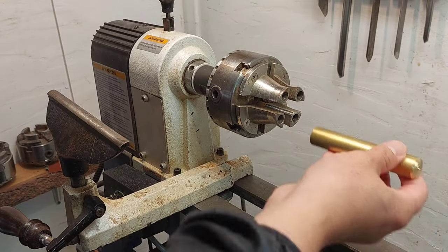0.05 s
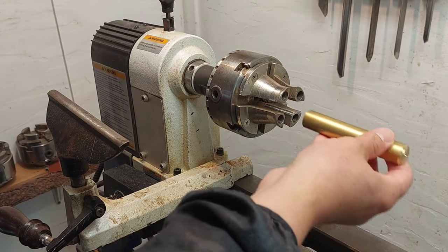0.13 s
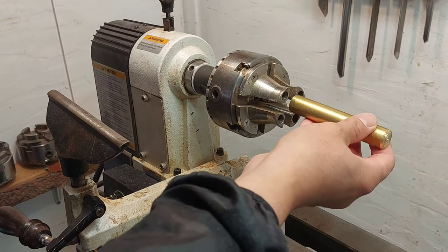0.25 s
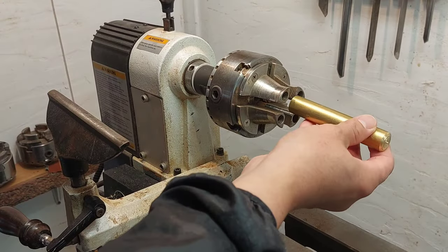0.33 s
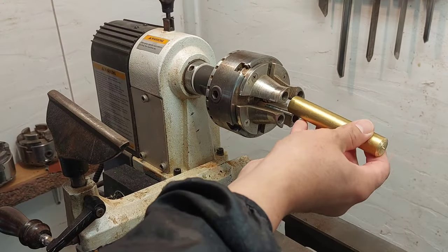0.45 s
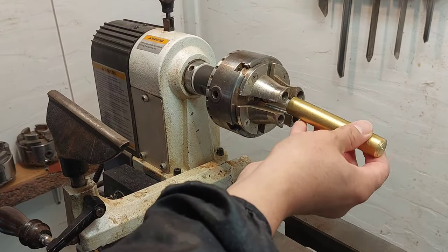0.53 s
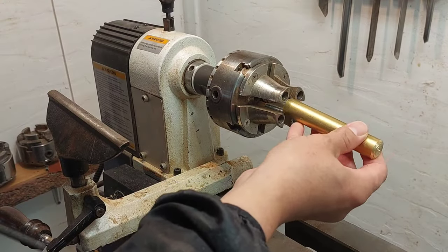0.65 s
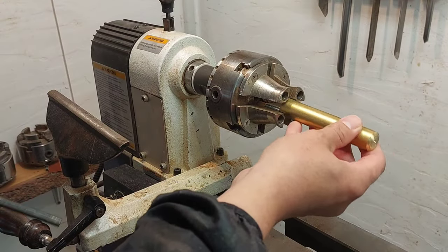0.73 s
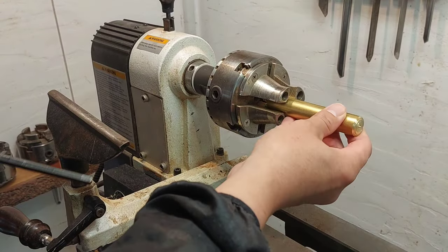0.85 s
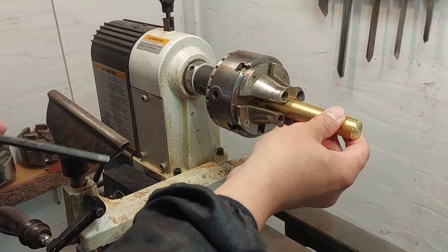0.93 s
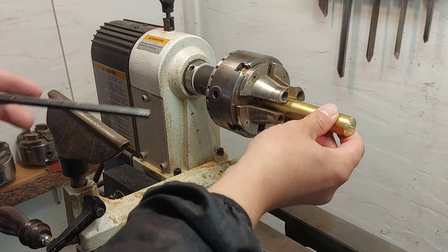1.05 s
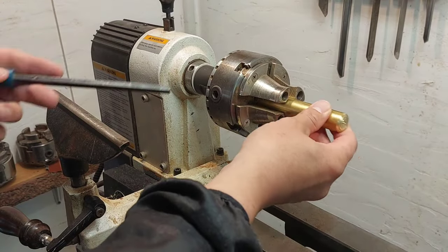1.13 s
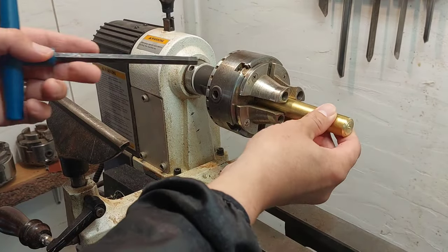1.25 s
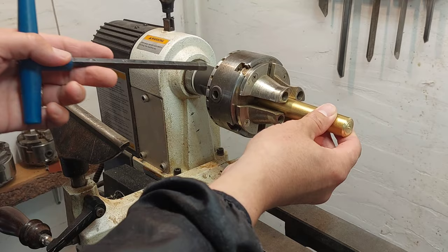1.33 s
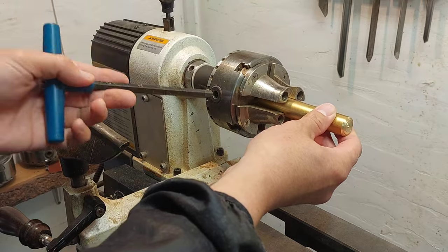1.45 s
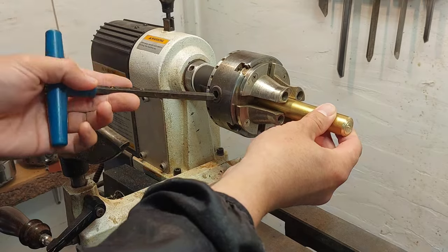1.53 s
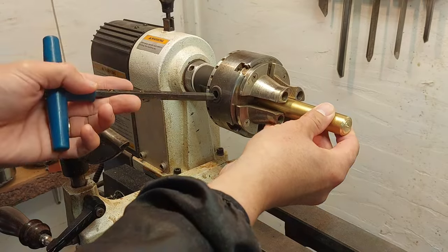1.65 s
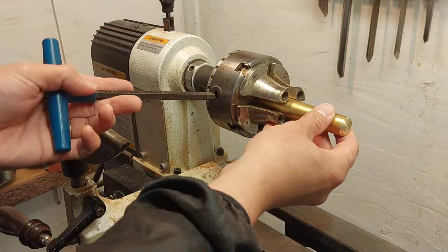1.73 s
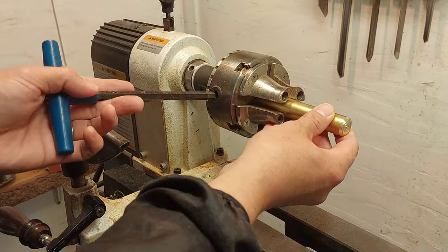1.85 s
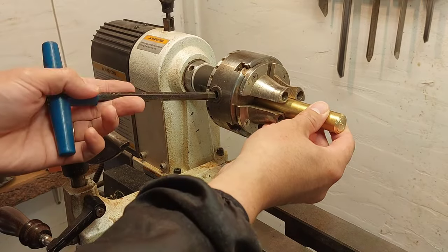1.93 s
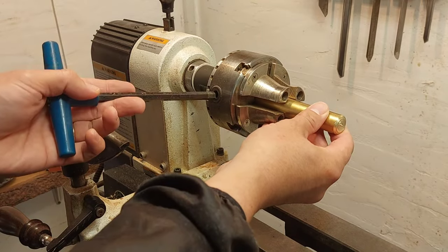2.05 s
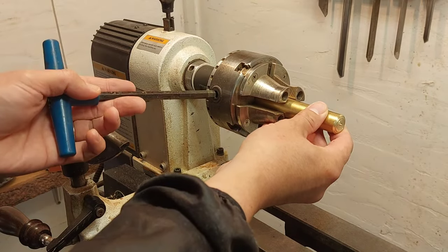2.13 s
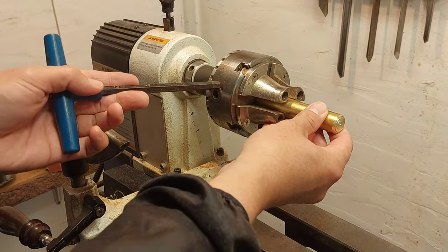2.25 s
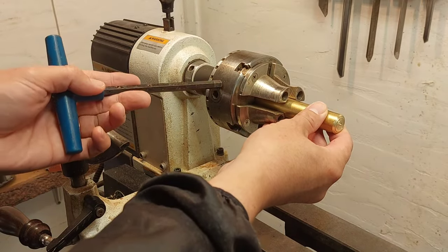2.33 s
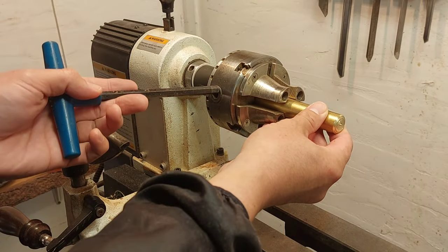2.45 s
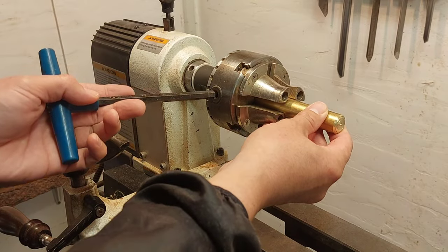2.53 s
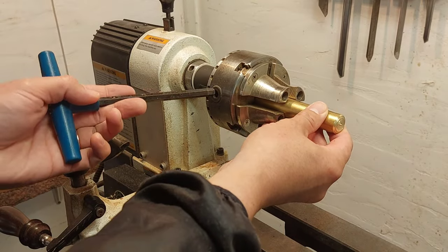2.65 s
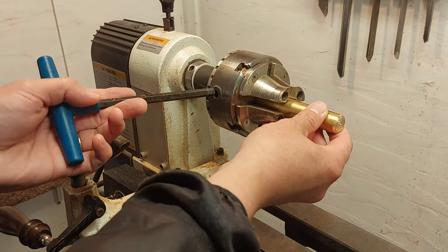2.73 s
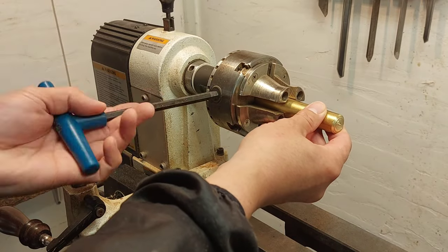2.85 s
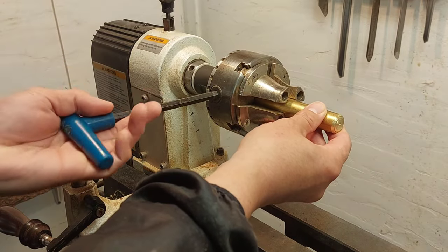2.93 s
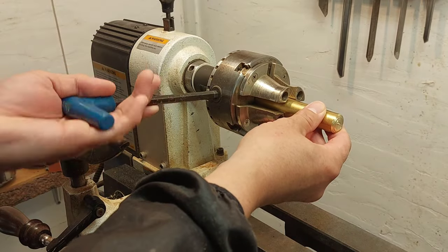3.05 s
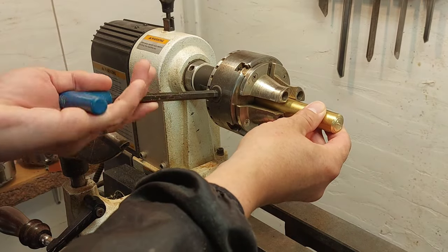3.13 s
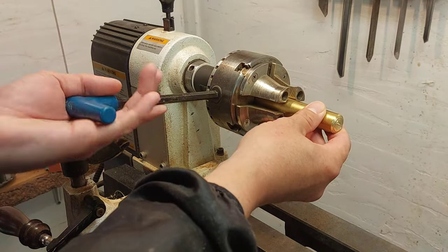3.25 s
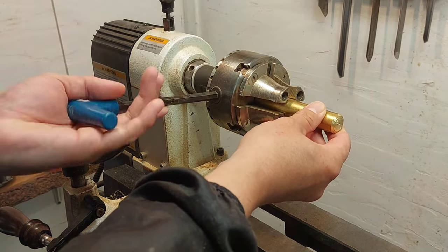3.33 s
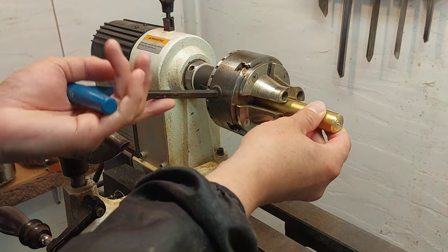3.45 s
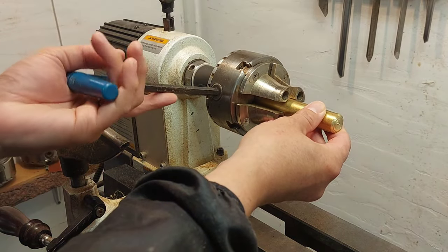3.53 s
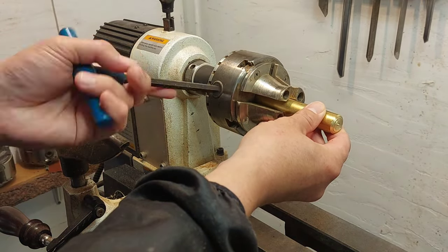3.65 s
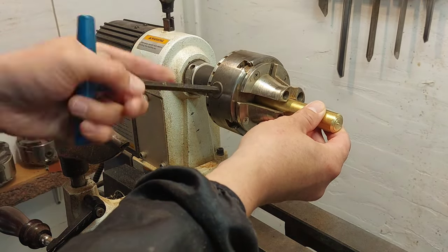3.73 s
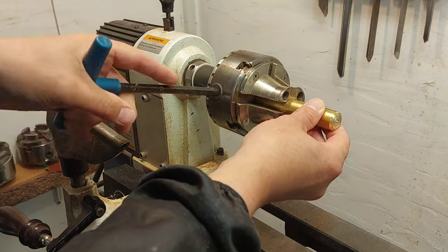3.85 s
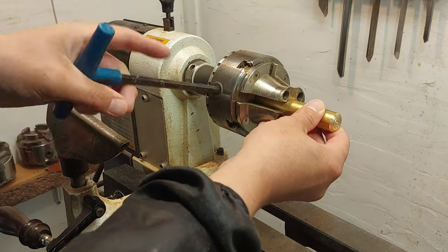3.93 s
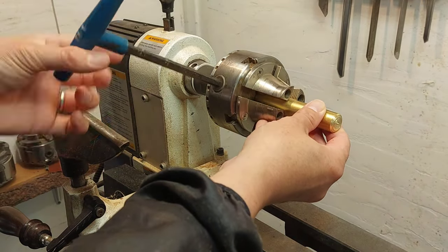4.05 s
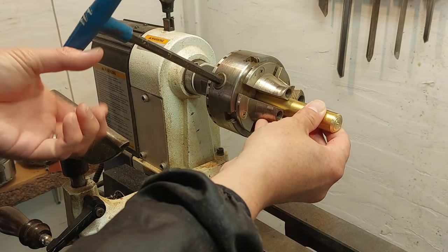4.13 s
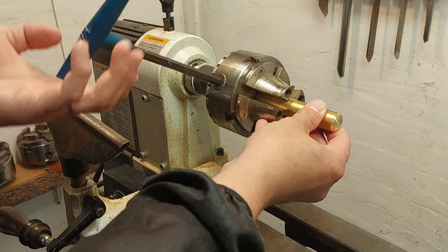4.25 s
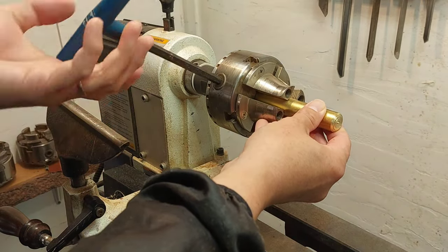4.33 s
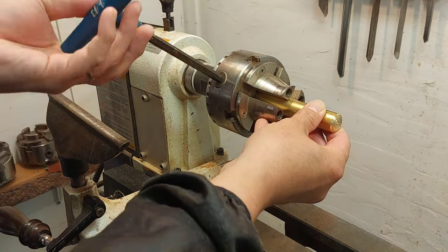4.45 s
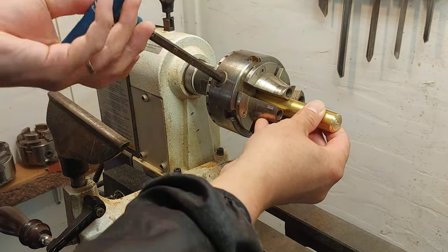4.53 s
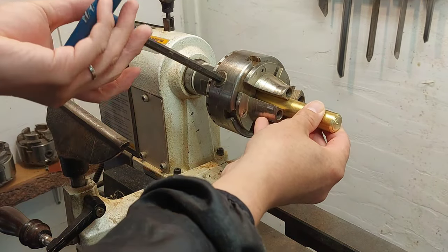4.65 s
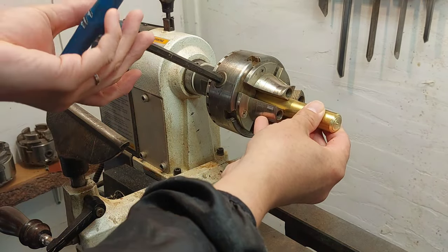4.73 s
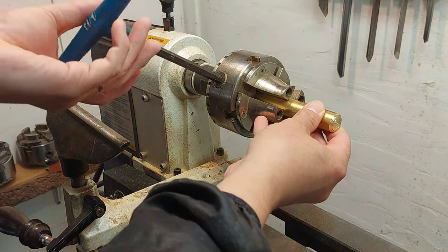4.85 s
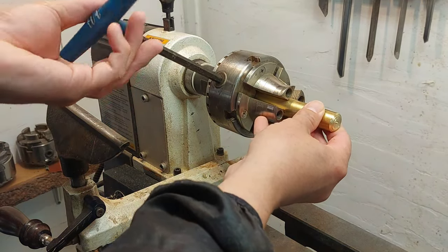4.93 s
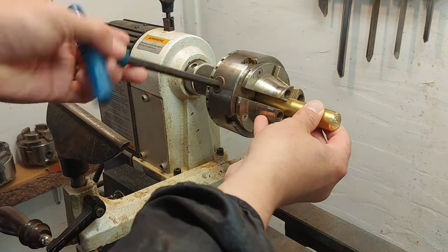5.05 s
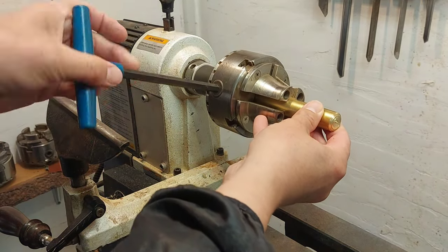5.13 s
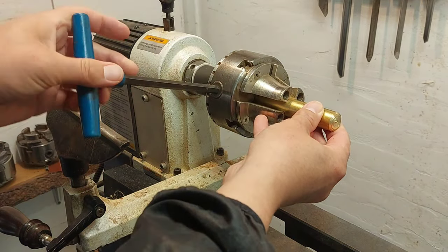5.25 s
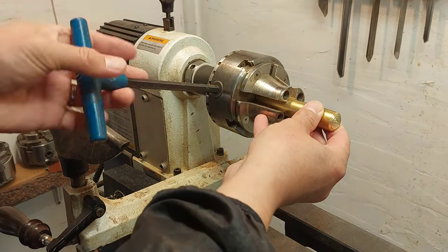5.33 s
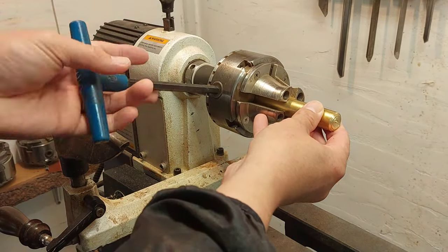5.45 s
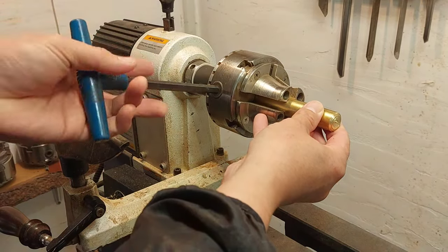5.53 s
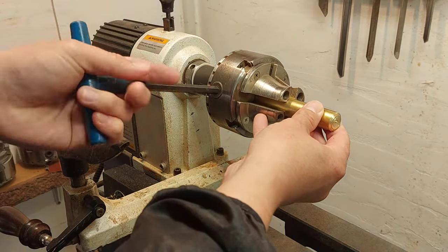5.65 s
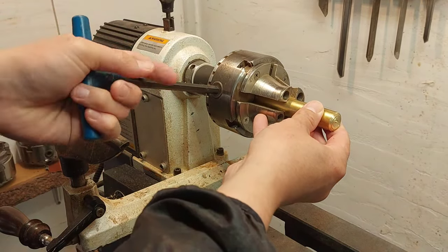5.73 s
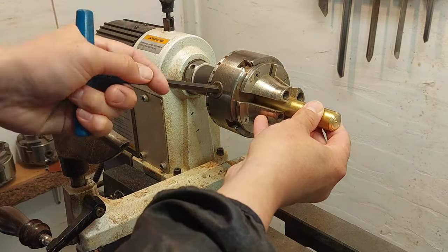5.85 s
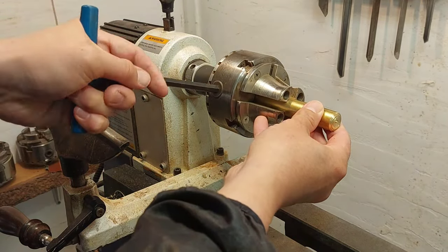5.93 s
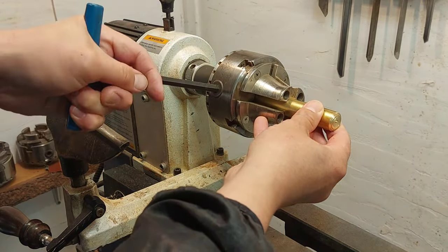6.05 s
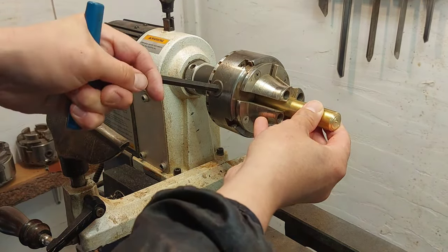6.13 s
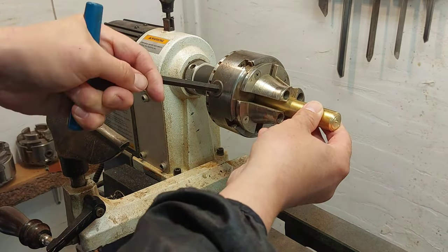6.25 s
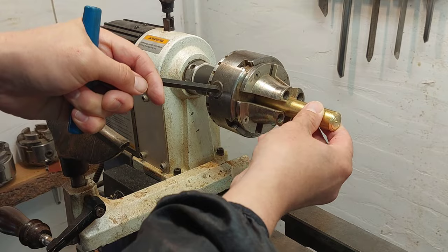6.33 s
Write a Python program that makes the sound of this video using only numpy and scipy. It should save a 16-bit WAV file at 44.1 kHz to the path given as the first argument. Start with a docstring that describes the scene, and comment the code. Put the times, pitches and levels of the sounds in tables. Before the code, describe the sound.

A metal bar knocks and slides into steel lathe jaws, a key strikes the chuck with a brief ring, then clicks in its socket.

```python
"""A small workshop lathe near a stereo camera. Throughout, filtered noise makes a room hum, a low rumble and
a rustle of sleeves and hands. First a brass bar knocks and slides between the steel chuck jaws, and amid
this a chuck key strikes the chuck once; then the key clicks in its socket, with a few more slides.
Contacts crack and clack (noise bursts) and ring (fading sines); thuds sound in the lathe body (low sines).
Noise that fades at its own speed at each pitch is the small room's answer."""
import sys
import numpy as np
from scipy import signal
from scipy.fft import rfft, irfft, next_fast_len
from scipy.io import wavfile
from scipy.ndimage import uniform_filter1d, map_coordinates

SR = 44100
rng = np.random.default_rng(int(sys.argv[2]) if len(sys.argv) > 2 else 0)


def unload_wav(signal):
    """Save mono or channel-first audio to the path in sys.argv[1] as 16-bit WAV at rate SR, clipped to [-1, 1]."""
    wavfile.write(
        sys.argv[1],
        SR,
        np.round(np.clip(np.atleast_2d(signal).T, -1, 1) * 32767).astype(np.int16),
    )


def to_linear_factor(level_db):
    """Convert decibel levels (scalar or array-like) to linear amplitude factors."""
    exponent = np.asarray(level_db, float) / 20
    return 10 ** exponent


N = 281604  # length in samples


def unit(x):
    """Scales a sound to an average strength (rms) of 1."""
    return x / np.sqrt(np.mean(x ** 2) + 1e-20)


def along(points, hz):
    """Reads a curve of (pitch_hz, value) points, evenly in octaves."""
    pitch, value = np.transpose(points)
    return np.interp(np.log(hz + 1), np.log(pitch + 1), value)


def coloured(x, gain):
    """Filters x by a gain that depends on pitch."""
    n = x.shape[-1]
    padded = next_fast_len(n + 4096)
    spectrum = rfft(x, padded) * gain(np.fft.rfftfreq(padded, 1 / SR))
    return irfft(spectrum, padded)[..., :n]


def tilt(db_per_octave, hz, pivot_hz):
    """Brightness in dB: a slope around a pivot; the added 99 Hz keeps it finite at 0 Hz."""
    return db_per_octave * np.log2((hz + 99) / pivot_hz)


def wobble(rate):
    """A smooth random curve through `rate` random values a second."""
    knots = rng.standard_normal(int(N * rate / SR) + 4)
    return map_coordinates(knots, [np.arange(N) * rate / SR])


def lean(db):
    """Left and right gains that differ by db; positive is stronger on the left."""
    return to_linear_factor([[db / 2], [-db / 2]])


# how alike left and right are: pitch_hz, likeness (1 = same, 0 = unrelated, below 0 = opposed)
LIKENESS = [(60, 0.48), (180, 0.94), (550, 0.65), (1650, -0.23), (4970, 0.078), (15000, -0.11)]
# how much stronger the left is: pitch_hz, difference_db
LEFT_LEAN = [(60, 6.5), (180, 7.5), (550, 4), (1650, 2.5), (4970, 5), (15000, 2)]


def rush(spectrum, patchy_db):
    """Steady stereo noise of rms 1, with patches of random gain in time and pitch."""
    grid = signal.stft(rng.standard_normal((2, N)), nperseg=512)[2]
    patches = uniform_filter1d(rng.standard_normal(grid.shape[1:]), size=6, axis=0)
    patches = unit(uniform_filter1d(patches, size=8, axis=1))
    pair = signal.istft(grid * to_linear_factor(patchy_db * patches), nperseg=512)[1][:, :N]

    def mid_side_gain(hz):
        # sharing the noise between mid and side by this angle sets the likeness
        angle = np.arccos(np.clip(along(LIKENESS, hz), -1, 1)) / 2
        return to_linear_factor(along(spectrum, hz)) * [np.cos(angle), np.sin(angle)]

    def left_right_gain(hz):
        return to_linear_factor(np.outer([.5, -.5], along(LEFT_LEAN, hz)))

    mid, side = coloured(pair, mid_side_gain)
    return unit(coloured(np.array([mid + side, mid - side]), left_right_gain))


# how fast the room dies away: pitch_hz, t60_s (time to fall by 60 dB)
ROOM_FADE = [(200, 0.43), (1000, 0.25), (4000, 0.19), (14000, 0.15)]


def room(length):
    """The room's tail at each microphone, energy 1: each pitch dies at its own speed."""
    hz, t, grid = signal.stft(rng.standard_normal((2, length)), SR, nperseg=256)
    fade = to_linear_factor(-60 * t / along(ROOM_FADE, hz)[:, None])
    tail = signal.istft(grid * fade, SR, nperseg=256)[1][:, :length]
    after = np.arange(length) / SR
    # machine and wall close by answer first and strongest
    tail *= (1 - np.exp(-after / 0.0029)) * (1 + 0.56 * np.exp(-after / 0.0023))
    return tail / np.linalg.norm(tail, axis=1)[:, None]


def echoed(x, wet_db):
    """The room's answer to a stereo sound."""
    return to_linear_factor(wet_db) * signal.fftconvolve(x, room(x.shape[1]), axes=1)[:, :x.shape[1]]


CHATTER = .2  # how strongly loose parts, rubbing while they ring, roughen each mode


def ring(modes, t, attack, scatter_db, colour, spread):
    """Fading, roughened sines, at new strengths for every blow and with phases that differ left to right."""
    hz, db, t60 = np.transpose(modes)[..., None]
    size, phase, apart = rng.standard_normal((3, len(modes), 1))
    drift = rng.standard_normal((len(modes), len(t) // 256 + 1))
    drift = np.repeat(drift, 256, axis=1)[:, :len(t)]
    drift = uniform_filter1d(np.cumsum(drift, axis=1) / 256, size=256, axis=1)
    phase = phase + CHATTER * drift * np.sqrt(hz / 2000)
    level = to_linear_factor(db + scatter_db * size + colour(hz) - 60 * t / t60) * (1 - np.exp(-t / attack))

    def heard(side):
        return np.sum(level * np.sin(2 * np.pi * hz * t + phase + side * spread * apart), axis=0)

    return np.array([heard(.5), heard(-.5)])


def burst(gain, t, t60, wet_db):
    """A brief noise, countless modes too short to tell apart, and the room's answer in the same colour."""
    gain_rms = np.sqrt(np.mean(gain(np.linspace(0, SR / 2, 999)) ** 2))
    envelope = to_linear_factor(-60 * t / t60) * (1 - np.exp(-t / 0.000089))
    near = coloured(rng.standard_normal((2, len(t))), gain) / gain_rms * envelope
    answer = coloured(room(len(t)), gain) / gain_rms
    return near, to_linear_factor(wet_db) * np.sqrt(t60 * SR) * answer


# colour of the sharp crack: pitch_hz, relative_level_db
CRACK_COLOUR = [(1470, -78.5), (2500, -14), (3330, -19.5), (4270, 2), (4990, 4.5), (8600, 2), (9290, -4),
                (13300, -5), (16000, -25)]


def blows(events, modes, clack_colour, near_lean_db, far_lean_db):
    """Every contact makes a sharp crack, a duller clack and a ring of the struck part, plus room."""
    t = np.arange(SR // 3) / SR
    out = np.zeros((2, N + SR))
    for start, db, clack_db, ring_db, bright, ring_bright, clack_bright in events:
        def crack_gain(hz):
            return to_linear_factor(along(CRACK_COLOUR, hz) + tilt(bright, hz, 6000))

        def clack_gain(hz):
            return to_linear_factor(along(clack_colour, hz) + tilt(clack_bright, hz, 1500))

        def ring_colour(hz):
            return ring_bright * np.log2(hz / 4700)

        crack, crack_room = burst(crack_gain, t, t60=.008, wet_db=-11.5)
        clack, clack_room = burst(clack_gain, t, t60=0.019, wet_db=-4)
        metal = to_linear_factor(ring_db) * ring(modes, t, 0.00023, scatter_db=2.5, colour=ring_colour, spread=0.83)
        near = lean(near_lean_db) * (crack + to_linear_factor(clack_db) * clack + metal)
        far = crack_room + to_linear_factor(clack_db) * clack_room + echoed(metal, wet_db=-1.5)
        first = round(start * SR)
        out[:, first:first + len(t)] += to_linear_factor(db) * (near + lean(far_lean_db) * far)
    return out[:, :N]


# colour of the building's rumble: pitch_hz, relative_level_db
RUMBLE_COLOUR = [(15, -45), (25, -22), (54, -5.5), (81, -12.5), (92, -5), (113, 1), (170, -12),
                 (220, -39.5), (370, -120)]
RUMBLE_DB, RUMBLE_FADES_DB_PER_S, RUMBLE_WAVERS_DB = -67.5, 0.67, 1


def rumble():
    """The building rumbles: very low noise that wavers and slowly fades."""
    fade_db = RUMBLE_FADES_DB_PER_S * np.arange(N) / SR
    level_db = RUMBLE_DB - fade_db + RUMBLE_WAVERS_DB * wobble(2.4)
    return to_linear_factor(level_db) * rush(RUMBLE_COLOUR, patchy_db=2.5)


# colour of the room hum, also of the lathe body under a slide: pitch_hz, relative_level_db
HUM_COLOUR = [(100, -48.5), (170, -18.5), (211, -5), (290, -9.5), (324, -1.5), (365, -13), (420, 2),
              (494, -9), (544, -11), (695, -12), (789, -30), (1000, -28), (1300, -56), (2200, -120)]
HUM_DB, HUM_WAVERS_DB = -64, 1.6


def hum():
    """The room hums: low-pitched noise with a slightly wavering level."""
    level_db = HUM_DB + HUM_WAVERS_DB * wobble(6.8) + 0.71 * wobble(14)
    return to_linear_factor(level_db) * rush(HUM_COLOUR, patchy_db=1.0)


# how the rustle rises and falls with the movement: time_s, level_db of its bright part
MOVEMENT = [(0, -49.5), (0.221, -52.5), (.3, -67.5), (.37, -76), (.45, -64), (.59, -67), (.81, -65),
            (1.05, -61.5), (1.26, -52.5), (1.49, -55), (1.62, -59.5), (1.79, -67.5), (2.16, -78.5),
            (2.391, -74.5), (2.469, -67.5), (2.54, -76), (2.74, -74.5), (2.919, -78), (2.98, -64.5),
            (3.14, -55.5), (3.22, -57.5), (3.35, -72.5), (3.439, -57.5), (3.66, -69.5), (3.82, -66),
            (3.96, -56.5), (4.04, -70), (4.26, -60), (4.34, -65), (4.49, -57), (4.62, -67), (4.72, -63),
            (5.16, -62), (5.24, -55.5), (5.32, -70), (5.39, -77.5), (5.44, -70.5), (5.72, -67.5),
            (6.05, -76.5), (6.14, -72), (6.3, -81.5), (6.39, -74.5)]
# bright part of the rustle: pitch_hz, relative_level_db
RUSTLE_COLOUR = [(1470, -36.5), (2500, -4.5), (3380, -8.5), (4800, -3), (5970, -4.5), (8200, -1),
                 (9510, -9), (11500, -4), (14900, -1.5), (15500, -4.5), (16000, -26)]
# duller, rubbing part: pitch_hz, relative_level_db
RUB_COLOUR = [(410, -32.5), (700, -2), (886, -5.5), (1510, -2), (2370, -4.5), (3500, -11.5), (4550, -27.5),
              (7700, -120)]
RUB_DB = -8.5  # dull part relative to the bright part


def rustle():
    """Cloth and skin rub as sleeves and hands move: bright and dull noise that follows the movement."""
    level_db = np.interp(np.arange(N) / SR, *np.transpose(MOVEMENT)) + 1.0 * wobble(6.5)
    bright = rush(RUSTLE_COLOUR, patchy_db=1.5)
    dull = to_linear_factor(RUB_DB + 1.4 * wobble(14)) * rush(RUB_COLOUR, patchy_db=1.0)
    return to_linear_factor(level_db) * (bright + dull)


# thuds: start_s, level_db (modes near 440 Hz), deep_db (deepest modes), other_db (other modes);
# the last two are relative to level_db
BODY_THUDS = [(.387, -43, -10.5, 9.5), (0.479, -58, 8.5, 7.5), (.668, -53.5, -12, 1.7),
              (0.705, -46, -15.5, -6), (.751, -30.5, -22.5, -6), (.832, -40, -6.5, .8),
              (0.892, -48, -1.5, -2.5), (1.127, -30, -21.5, -9.5), (1.24, -38.5, -18.5, -21),
              (1.313, -47.5, -13, 1.5), (1.369, -55, 6, 8), (1.419, -61, 4, 5), (1.644, -42.5, -17, -14.5),
              (2.048, -66, -24, 3), (2.817, -55, -3.5, -6.5), (3.017, -45.5, -12, 3.5),
              (3.494, -56, -2, 2.5), (3.949, -65.5, -3, -4), (4.166, -56.5, 0, 0.5),
              (4.417, -46.5, -18, -7.5), (5.209, -54.5, -20, -0.5), (5.466, -58, 6, 4.5),
              (5.481, -56, 5.5, -2.5), (5.562, -68, 14, 1), (5.591, -65, -5, -1)]
# modes of the lathe body: pitch_hz, level_db, t60_s (time to fall by 60 dB)
BODY_MODES = [(82.4, -6.5, 0.13), (112.3, -1, 0.29), (146, -2.5, 0.24), (182, -5, 0.2), (214, -7, 0.34),
              (260.6, -3.5, 0.25), (297.2, -5, 0.22), (323.5, -10.5, 0.23), (445.5, -2, 0.41),
              (429.4, -4, 0.19), (501.2, 0, 0.15), (540.3, 1.6, 0.16), (587, -4, .1), (633.3, -2, 0.066),
              (735, -7.5, 0.1), (889, -10, 0.15), (1170, -14.5, 0.099), (1298, -16.5, 0.21)]


def thuds():
    """The heavy lathe body starts slowly and sounds nearly alike in both microphones."""
    t = np.arange(SR // 2) / SR
    out = np.zeros((2, N + SR))
    for start, db, deep_db, other_db in BODY_THUDS:
        mix = [(130, deep_db), (260, other_db), (370, other_db), (440, 0), (480, other_db)]  # pitch_hz, db

        def colour(hz):
            return along(mix, hz)

        thud = ring(BODY_MODES, t, 0.0055, scatter_db=2.2, colour=colour, spread=0.25)
        first = round(start * SR)
        out[:, first:first + len(t)] += to_linear_factor(db) * lean(4.8) * (thud + echoed(thud, wet_db=-7.5))
    return out[:, :N]


# metal sliding on metal: middle_s, length_s, level_db, body_db (lathe body relative to level_db)
SLIDE_STROKES = [(0.449, .1, -49.5, 0), (0.722, 0.087, -63, -9), (0.968, 0.14, -52, 0.8),
                 (1.343, 0.19, -53.5, 4), (2.085, 0.18, -72.5, 14), (3.942, .12, -55.5, 0),
                 (5.248, 0.073, -58.5, 2), (5.52, 0.19, -79, 19.5), (5.821, 0.086, -74.5, -3)]


def slides():
    """Each stroke swells and fades, rasps in uneven grains and sets the lathe body humming."""
    middle, length, db, body_db = np.transpose(SLIDE_STROKES)[..., None]
    stroke = to_linear_factor(db) * np.exp(-(2 * (np.arange(N) / SR - middle) / length) ** 2)
    grain = unit(to_linear_factor(3.5 * wobble(150)))
    rasp = grain * (rush(RUB_COLOUR, patchy_db=4.0) + to_linear_factor(-8.5) * rush(RUSTLE_COLOUR, patchy_db=1.5))
    body = rush(HUM_COLOUR, patchy_db=1.0)  # in the room's colour
    return stroke.sum(axis=0) * rasp + (to_linear_factor(body_db) * stroke).sum(axis=0) * body


# the key's one free blow on the chuck body: start_s, crack_db, clack_db, ring_db (both relative to the crack),
# then crack, ring and clack brightness in dB per octave
KEY_STRIKE = [(1.127, -21, -11, -5, -5, 0.78, -.4)]
# modes of the steel: pitch_hz, level_db, t60_s
STEEL_MODES = [(1390, -15, .1), (1482, -9, .15), (1890, -17, .1), (2052, -16, .1), (2251, -10, .13),
               (2304, -5, .13), (2388, -7, .12), (2520, -12, .1), (3400, -18, .1), (3864, -18, .13),
               (3965, -16, .1), (4390, -13, .08), (4518, -11, .09), (4637, -19, .3), (4823, 0, .1),
               (4901, -7, .09), (5010, -12, .08), (5650, -19, .08), (7714, -19, .1), (8882, -20, .1),
               (12475, -16, .2)]
# colour of the key's clack, on the chuck or in the socket: pitch_hz, relative_level_db
KEY_CLACK_COLOUR = [(410, -44), (700, 1.5), (1080, -1.5), (1950, 3.5), (2130, 1), (3500, 5), (4550, -0.5),
                    (7700, -120)]


def strike():
    """The key strikes the steel chuck, which rings in many close modes."""
    return blows(KEY_STRIKE, STEEL_MODES, KEY_CLACK_COLOUR, near_lean_db=4.0, far_lean_db=2.5)


# clicks of the key: start_s, crack_db, clack_db (relative to the crack), crack brightness in dB per octave
KEY_CLICKS = [(1.6429, -24.5, -22, -0.4), (1.6437, -25, -15.5, -1.4), (1.7579, -55.5, -26, 11.5),
              (2.423, -55.5, -10, -11), (2.77, -40, -17, 1), (3.0052, -41.5, -8, -5),
              (3.0143, -15, -21.5, 13.5), (3.0191, -17.5, -17, 1), (3.029, -30, -9, -2),
              (3.048, -35, -9, -2), (3.0801, -35, -12.5, -6), (3.4939, -30, -14, 1), (3.7446, -48, -10, 0),
              (3.8598, -55.5, -8, -13.5), (4.169, -67, -5, -1), (4.414, -37, -11.5, -1.2),
              (4.4481, -42, -10.5, 8), (5.182, -57.5, -1, -9), (5.2077, -43, -6.5, -5.5),
              (5.2347, -41.5, -8.5, 7.5), (5.462, -42, -13.5, 3), (5.5906, -44.5, -13, -5),
              (5.7919, -48.5, -17, 2.5), (5.8241, -54, -7.5, -6.5)]
# modes of key and socket: pitch_hz, level_db, t60_s
SOCKET_MODES = [(3391, -10, .05), (3838, -6, .06), (4527, -6, .05), (5141, -1, .07), (5394, -3, .07),
                (6239, -6, .05), (7063, -5, .06), (7779, -2, .06), (8590, -7, .05), (11120, -10, .04),
                (12270, -10, .04)]
KEY_RING_DB, KEY_RING_BRIGHT = -23.5, 4  # relative to the crack; dB per octave


def key():
    """The key clicks in its socket with a short, weak ring, nearer the left microphone."""
    events = [(start, db, clack_db, KEY_RING_DB, bright, KEY_RING_BRIGHT, 0)
              for start, db, clack_db, bright in KEY_CLICKS]
    return blows(events, SOCKET_MODES, KEY_CLACK_COLOUR, near_lean_db=9.5, far_lean_db=0.0)


# knocks of the bar: start_s, crack_db, clack_db, ring_db (both relative to the crack),
# clack brightness in dB per octave
BAR_KNOCKS = [(.386, -30.5, -4.5, -20, -3), (.4788, -44, -3, -14.5, 6), (.674, -60.5, 4.5, -20, -1.5),
              (.711, -54, -2, -21, -6), (0.7516, -35, 0.5, -12, -1.5), (0.8309, -36.5, -3, -21.5, 0),
              (0.835, -17.5, -14.5, -31.5, 2.5), (.9, -48.5, -6.5, -8, -0.5), (0.9501, -49, 1, -10.5, 0),
              (0.989, -55.5, 2, -8, -0.5), (1.0532, -55.5, 9.5, -0.9, 0.8), (1.2685, -48, 1.5, -6, 0),
              (1.3132, -47, 1.3, 1.8, -0.5), (1.345, -56, -12, 4, 0), (1.3691, -39, -8.5, -10.5, 6),
              (1.395, -57, 7.5, -17, 2)]
# modes of the brass bar: pitch_hz, level_db, t60_s
BRASS_MODES = [(4590, -6, .1), (4675, -1, .13), (4735, -6, .1), (7590, -16, .1), (7795, -16, .1),
               (11540, -8, .13), (11620, -12, .1), (14800, -19, .07)]
# colour of the bar's clack: pitch_hz, relative_level_db
BAR_CLACK_COLOUR = [(350, -32), (600, -8), (1380, -12), (1480, -10.5), (2260, -18), (2700, -11.5),
                    (3500, -15.5), (4550, -54.5), (7700, -120)]
BAR_BRIGHT, BAR_RING_BRIGHT = -2, -8  # dB per octave: every crack, and the ring of a light contact
HARD_DB, HARDENS = -37.5, 1.21  # above this crack_db the ring gains so many dB per octave for each dB


def bar():
    """The brass bar knocks on the steel jaws; harder contacts ring brighter."""
    events = []
    for start, db, clack_db, ring_db, clack_bright in BAR_KNOCKS:
        ring_bright = BAR_RING_BRIGHT + HARDENS * max(db - HARD_DB, 0)
        events.append((start, db, clack_db, ring_db, BAR_BRIGHT, ring_bright, clack_bright))
    return blows(events, BRASS_MODES, BAR_CLACK_COLOUR, near_lean_db=0.9, far_lean_db=1.0)


def scene():
    """The air of the room, the lathe body, the key and the bar together."""
    air = rumble() + hum() + rustle()
    return air + thuds() + slides() + strike() + key() + bar()


def roll_off(x):
    """The treble ends steeply here."""
    return signal.sosfilt(signal.butter(12, 16520, fs=SR, output="sos"), x)


def record(dry):
    """The finished stereo mix as the camera keeps it."""
    return roll_off(dry)


dry = scene()
out = record(dry)
unload_wav(out)
```